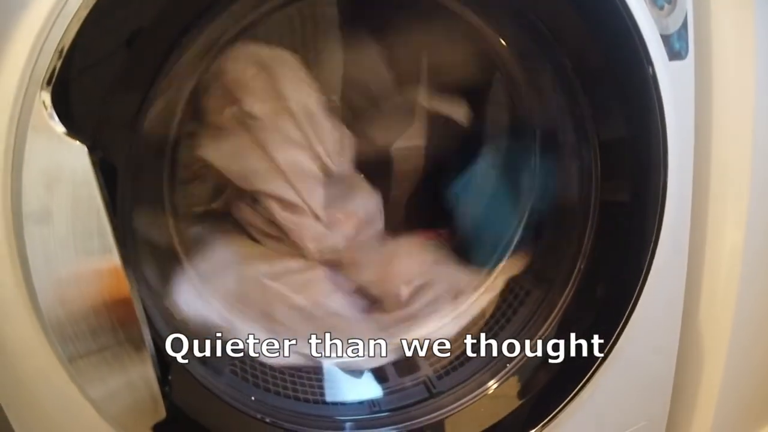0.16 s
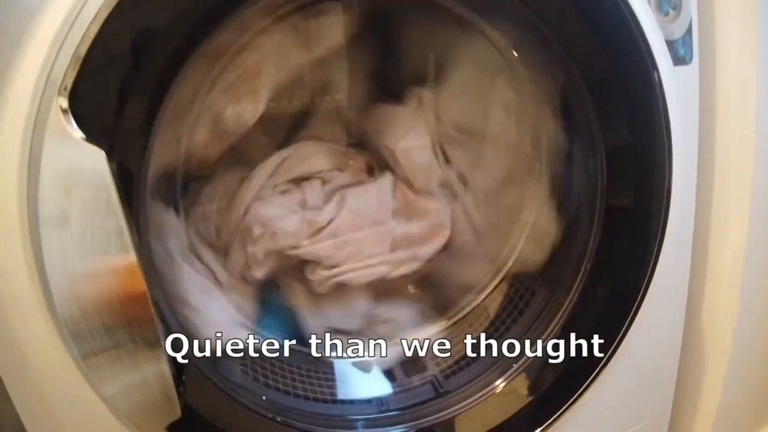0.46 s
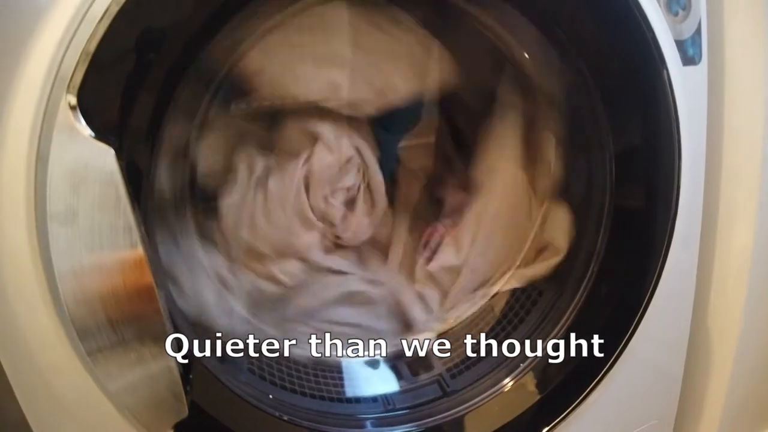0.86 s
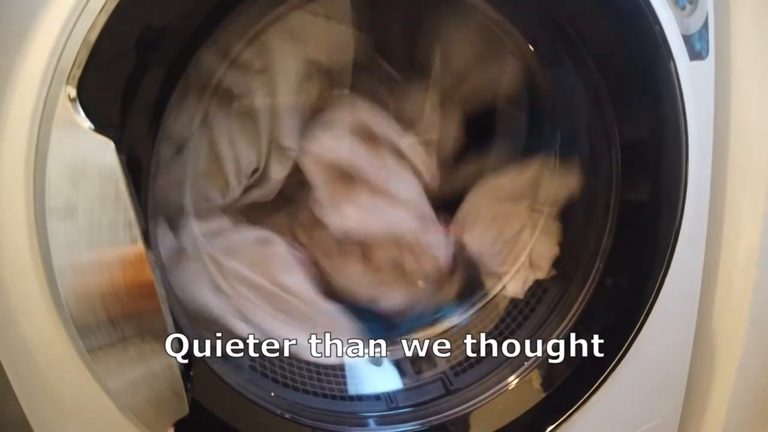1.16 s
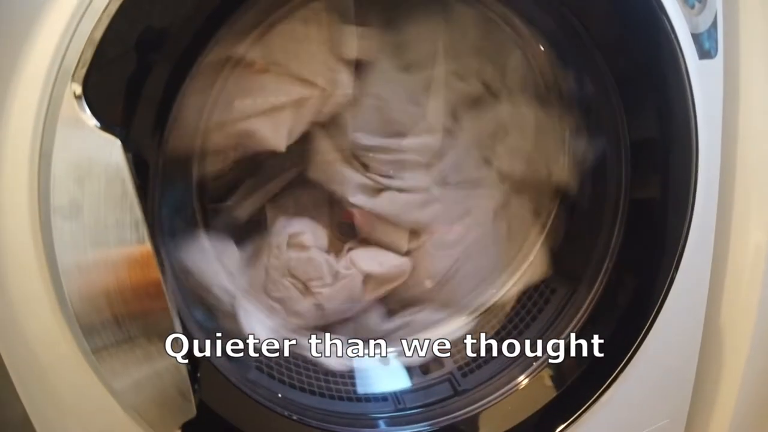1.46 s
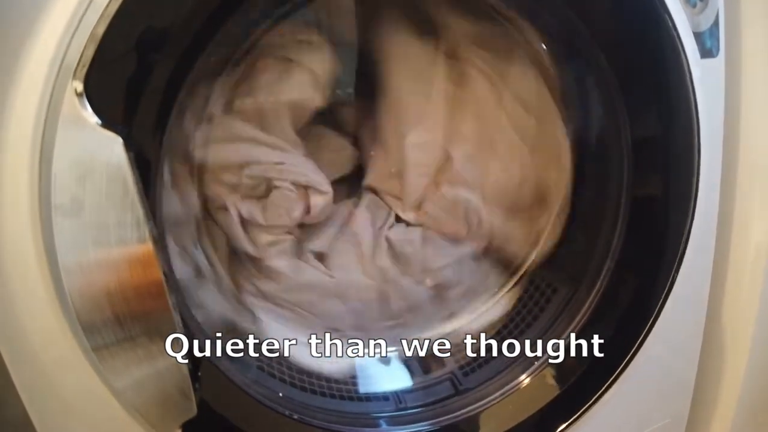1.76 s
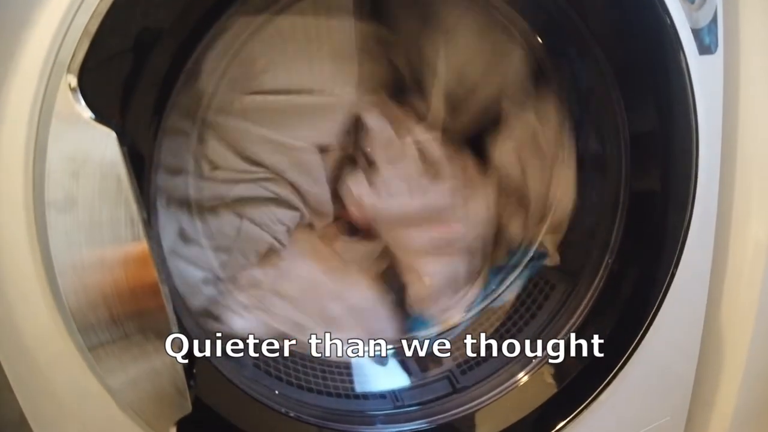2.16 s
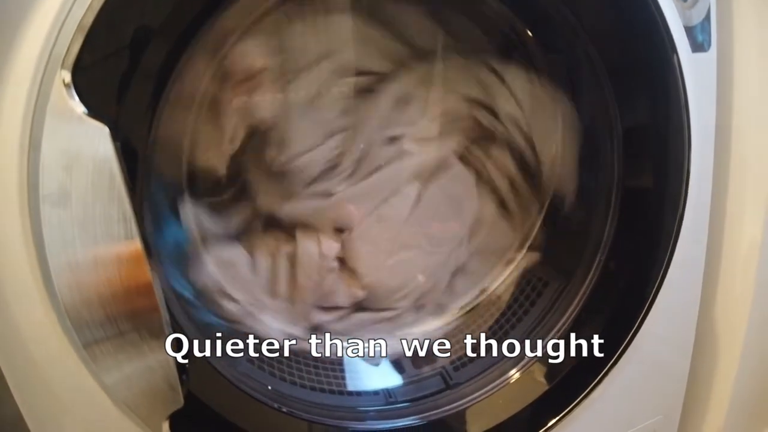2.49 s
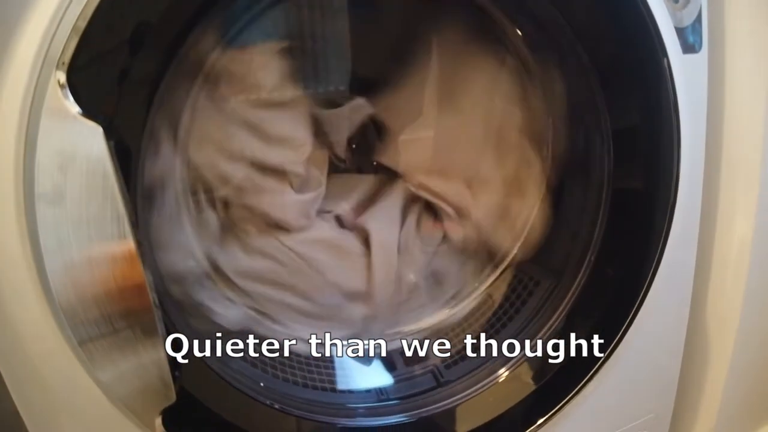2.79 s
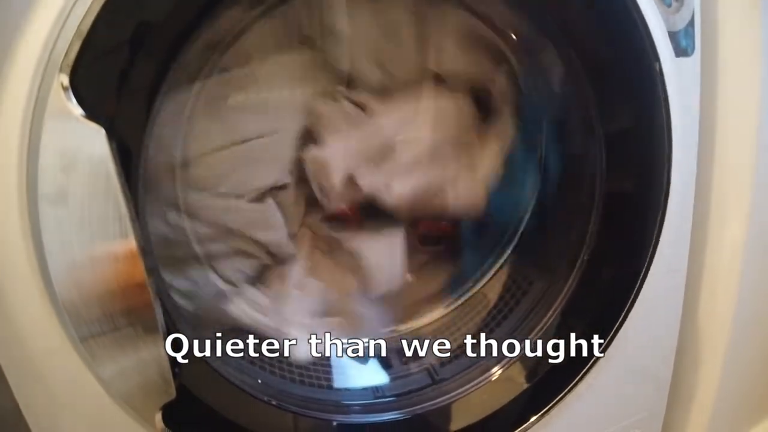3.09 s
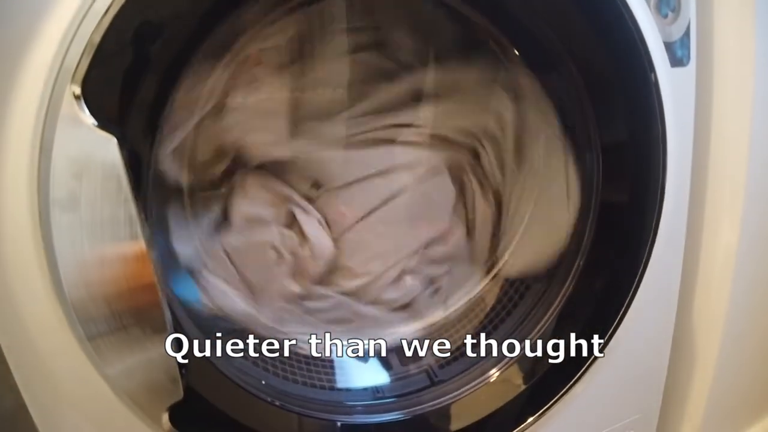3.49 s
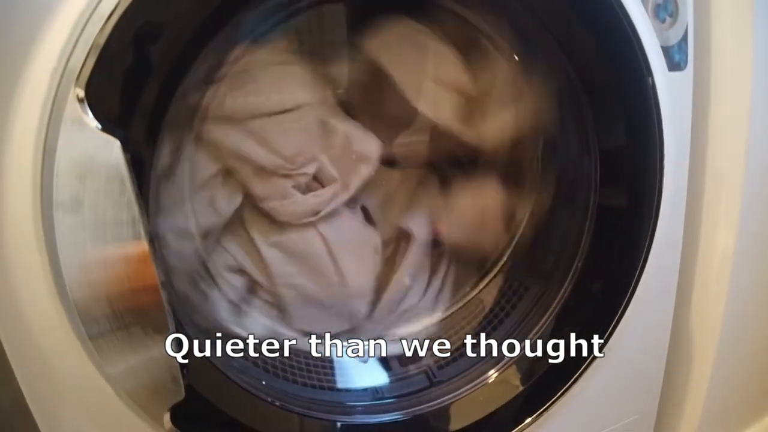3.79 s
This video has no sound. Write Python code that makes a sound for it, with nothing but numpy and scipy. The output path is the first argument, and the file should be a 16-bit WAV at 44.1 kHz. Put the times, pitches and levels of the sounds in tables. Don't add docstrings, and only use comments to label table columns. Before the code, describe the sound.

A tumble dryer runs close by, booming softly and humming as sheets thud and roll inside.

```python
import sys
import numpy as np
from scipy import signal
from scipy.fft import rfft, irfft, next_fast_len
from scipy.io import wavfile
from scipy.ndimage import uniform_filter1d, map_coordinates

SR = 44100
rng = np.random.default_rng(int(sys.argv[2]) if len(sys.argv) > 2 else 0)


def linear_from_db(decibels):
    return 10 ** (np.asarray(decibels, float) / 20)


def wav_record(signal):
    frames = np.transpose(np.atleast_2d(signal))
    bounded = np.clip(frames, -1, 1)
    quanta = np.round(bounded * 32767).astype(np.int16)
    wavfile.write(sys.argv[1], SR, quanta)


N = 173754

# (frequency [Hz], density [dB per Hz])
AIR_SPECTRUM = [(530, -11), (900, -5.5), (986, -8.5), (1080, -5.5), (1740, -2.5), (2620, -15), (3860, -20),
                (5110, -26.5), (6500, -23), (8450, -29), (14300, -120)]
# (time [s], level [dB])
DUCT_FLOW = [(0, -48.5), (.12, -43), (.3, -47.5), (.47, -48.5), (.69, -46.5), (.83, -44.5), (1.25, -46),
             (1.38, -44), (1.5, -45), (1.74, -46.5), (1.85, -44.5), (2.1, -48.5), (2.68, -45),
             (3.12, -47.5), (3.35, -45.5), (3.5, -43.5), (3.74, -45), (3.94, -48)]
# (frequency [Hz], width [Hz], level [dB])
DUCT_MODES = [(1760, 180, -1), (1526, 130, -5), (2058, 29, -2), (2190, 69, -11)]
# (frequency [Hz], density [dB per Hz])
RUMBLE_SPECTRUM = [(20, 4), (50, 5.5), (140, -10.5), (300, -8), (480, -14.5), (900, -16), (1500, -43)]

# (motor order [1], level [dB]))
CARRIERS = [
    (10305, [(-4, -86), (-2, -83), (-1, -82), (0, -71), (1, -80)]),
    (7605, [(-2, -70), (0, -68), (2, -72)]),
]
# (time [s], upper level [dB], lower level [dB])
WHISTLE_LEVELS = [(0, -71, -69), (.6, -78, -66), (1, -73, -55), (1.25, -62, -50), (1.55, -71, -71),
                  (2, -68, -58), (2.4, -72, -62), (2.7, -66, -53), (3.05, -70, -56), (3.3, -75, -62),
                  (3.94, -64, -56)]
# (time [s], rise [dB])
WHISTLE_FLARES = [
    (1.12, 3),
    (1.22, 4.5),
    (1.33, 4),
    (1.43, 5),
    (1.93, 3),
    (2.53, 5),
    (3.65, 7),
]
# (frequency [Hz], width [Hz], level [dB])
IRON_MODES = [(7245, 40, -7), (7310, 60, -10), (7440, 60, -8), (7555, 60, 0), (7620, 60, -4),
              (7700, 80, -3), (7880, 140, -5), (7995, 70, -4), (8140, 70, -10), (8250, 120, -12),
              (8370, 80, -9), (8530, 100, -12), (8622, 45, -9), (8760, 110, -18)]
# (frequency [Hz], width [Hz], level [dB])
RING_MODES = [(10130, 60, -7), (10235, 50, 0), (10340, 200, -4), (10490, 60, -6), (10650, 250, -11)]
# (frequency [Hz], density [dB per Hz])
HISS_SPECTRUM = [(5000, -22), (6500, -1.5), (7100, 9.5), (9100, 3.5), (9450, -3), (10000, -2), (10600, -4),
                 (11500, -3.5), (13000, -24), (15300, -9)]

# (frequency [Hz], level [dB])
MAINS = [(100.3, -34.5), (200.5, -41)]
# (time [s], level [dB])
MOTOR_EFFORT = [(0, -6), (.06, -2), (.2, 2), (.36, -2.5), (.45, -1.5), (.7, 3.5), (.86, -6.5), (.95, -1),
                (1.6, 1), (1.86, -3.5), (1.97, 0.5), (2.17, -4), (2.26, 1), (2.4, -12.5), (2.56, 2),
                (3.05, 1), (3.6, 1.5), (3.94, -6.5)]
# (order [1], level [dB])
MOTOR_ORDERS = [(2, -55.5), (3, -53.5), (4, -54.5), (6, -55.5)]
# (order [1], level [dB])
FAN_ORDERS = [(2, -56.5), (3, -55), (4, -57.5)]
# (time [s], level [dB])
UNMUFFLED = [(0, -5.5), (.14, 5), (.42, -4.5), (.55, 0.5), (.98, -5), (1.33, 2.5), (1.57, -0.5), (1.86, 1),
             (2.22, 3), (2.5, 1.5), (2.69, -3.5), (3, 2.5), (3.41, 3), (3.6, -2.5), (3.85, -19),
             (3.94, -10)]

# (frequency [Hz], width [Hz], level [dB])
PANEL_MODES = [(182, 71, -1), (223.8, 16.3, 0), (248.5, 33, -8), (271.4, 10, -5)]
# (time [s], level [dB])
PANEL_DRIVE = [(0, -32.5), (.4, -39.5), (.7, -34.5), (1.1, -41), (1.35, -32), (1.7, -33), (1.95, -31),
               (2.2, -34), (2.45, -38), (2.85, -32.5), (3.3, -37), (3.55, -43), (3.94, -39)]
# (frequency [Hz], width [Hz], level [dB])
TRIM_MODES = [(317.3, 43, -2.5), (358, 10.5, -6.5), (392.5, 20.5, -2), (422, 19.6, -4), (535, 27, -2),
              (578.7, 101, -4), (681, 26, -3), (743.5, 42, -6.5), (808, 116, -11), (960, 34, -14),
              (1091, 21, -12.5), (1141, 20, -9)]
# (time [s], rise [dB])
CLOTH_SWEEPS = [
    (.1, 3),
    (.69, 2.5),
    (1.22, 1.5),
    (1.33, 5),
    (1.84, 6),
    (2.72, 4.5),
    (2.82, 3.5),
    (3.35, 1),
    (3.62, 4.5),
]
# (frequency [Hz], width [Hz], level [dB])
DRUM_MODES = [(30, 26, -7), (59.1, 18, -5), (77.6, 30, -4), (113, 20.2, -4.5)]
# (time [s], level [dB])
ROLLING_LOAD = [(0, -30), (.3, -33.5), (.75, -28.5), (.9, -35), (1.2, -33), (1.5, -37), (1.9, -39.5),
                (2.25, -36), (2.6, -31), (3.1, -33.5), (3.5, -31), (3.94, -32)]
# (crest time [s], level [dB], drum pitch [Hz])
LANDINGS = [(.15, -25, 77.7), (.28, -24.5, 75.6), (.47, -23.5, 78.4), (.65, -20, 73), (.75, -24, 67.3),
            (.8, -26, 78), (1.03, -25, 72), (.93, -27, 72), (1.12, -23, 70.4), (1.43, -26, 73),
            (1.635, -22, 71.7), (1.784, -18, 76.3), (1.97, -25, 72.4), (2.29, -27.5, 69), (2.51, -23.5, 70),
            (2.8, -29, 70), (2.93, -23, 68), (3.17, -27, 74), (3.6, -24.5, 73), (3.82, -28, 78.2)]

# (frequency [Hz], correlation [1])
PORT_LIKENESS = [(30, 1), (80, .9995), (180, 1), (350, 0.99), (700, 0.97), (1000, 0.85), (1800, 0.92),
                 (2150, .5), (2500, -0.52), (3000, -0.35), (3400, -0.38), (3850, 1), (4400, -0.27),
                 (5800, -0.28), (6600, 0.097), (7300, -0.069), (7900, -0.24), (8600, 0.053), (9500, 0.35),
                 (10400, 0.49), (11300, -0.26), (13500, 0.15), (14500, 0.38), (15300, .9)]
# (frequency [Hz], share [1])
PORT_LEAD = [(2000, -0.19), (2600, -.1), (3500, -.1), (5000, 0), (6600, 0.22), (8600, .2), (9200, 0),
             (10800, -.2), (13000, 0)]
# (frequency [Hz], share [1])
LEAD_WANDER = [(2000, 0.24), (3000, .15), (6500, .2), (7300, .8), (8400, .7), (9200, .3), (10300, .7),
               (11500, .4), (13500, .6), (15000, .2)]
# (frequency [Hz], share [1])
LOST_CELLS = [(2200, 0), (2800, .07), (3800, .04), (5200, .26), (6800, .03), (8700, .05), (9500, .33),
              (10250, .02), (11200, .42), (12500, .7), (14500, .58), (15300, .1)]
# (frequency [Hz], share [1])
LOST_SIDE_CELLS = [(9000, 0), (11000, .05), (12500, .03), (14500, .15), (15300, .75)]

MOTOR_HZ, FAN_HZ, DRUM_HZ = 182.5, 267.6, 75.6
RISE_S, FALL_S = 0.044, 0.022
SWEEP_S, FLARE_S = 0.026, 0.033


def unit(x):
    return x / np.sqrt(np.mean(x ** 2) + 1e-20)


def along(points, hz):
    f, v = np.transpose(points)
    return np.interp(np.log(hz + 1), np.log(f + 1), v)


def curve(rows, axis=1):
    rows = np.transpose(rows)
    v = np.interp(np.arange(N) / SR, rows[0], rows[axis])
    return v - v.mean()


def swells(rows, width_s):
    t = np.arange(N) / SR
    return sum(db * np.exp(-((t - s) / width_s) ** 2) for s, db in rows)


def wobble(rate):
    knots = rng.standard_normal(int(N * rate / SR) + 4)
    return map_coordinates(knots, [np.arange(N) * rate / SR])


def filtered(x, response):
    m = next_fast_len(N + SR // 2)
    return irfft(rfft(x, m) * response(np.fft.rfftfreq(m, 1 / SR)), m)[..., :N]


def body(modes, steep=1):
    def response(f):
        power = 0
        for c, w, db in modes:
            mode = f * w / (c * c - f * f + 1j * f * w)
            power = power + np.abs(linear_from_db(db) * mode ** steep) ** 2
        return np.sqrt(power)
    return response


def spectrum(points):
    return lambda f: linear_from_db(along(points, f))


def rush(response, patchy_db, wide=6, long=14):
    z = signal.stft(rng.standard_normal((2, N + 512)), nperseg=512)[2]
    field = uniform_filter1d(rng.standard_normal(z.shape[1:]), wide, 0)
    field = unit(uniform_filter1d(field, long, 1))
    noise = signal.istft(z * linear_from_db(patchy_db * field), nperseg=512)[1][:, :N]
    return unit(filtered(noise, response))


def tones(lines, drift, swing_db, rate):
    t = np.arange(N) / SR
    total = 0
    for hz, db in lines:
        phase = 2 * np.pi * hz * t + drift * wobble(9) + 2 * np.pi * rng.random((2, 1))
        total = total + linear_from_db(db) * unit(linear_from_db(swing_db * wobble(rate)) * np.sin(phase))
    return total


def port_draught():
    return linear_from_db(-60) * rush(body([(40, 60, 0), (180, 200, -12)]), patchy_db=1.5)


def rumble():
    return linear_from_db(-38) * rush(spectrum(RUMBLE_SPECTRUM), patchy_db=0.95)


def air():
    flow_level = linear_from_db(-44 + 0.24 * curve(DUCT_FLOW) + 0.2 * wobble(8.74))
    flow = flow_level * rush(spectrum(AIR_SPECTRUM), patchy_db=1.5, wide=3, long=20)
    duct_level = linear_from_db(-51.5 + 2.0 * curve(DUCT_FLOW))
    return flow + duct_level * rush(body(DUCT_MODES, steep=2), patchy_db=0.0)


def whistles():
    voices = []
    for i, (hz, sidebands) in enumerate(CARRIERS):
        lines = [(hz + k * MOTOR_HZ, db) for k, db in sidebands]
        level = linear_from_db(curve(WHISTLE_LEVELS, axis=i + 1))
        voices.append(level * tones(lines, drift=2.5, swing_db=3, rate=3))
    upper, lower = voices
    return linear_from_db(swells(WHISTLE_FLARES, FLARE_S)) * upper + lower


def motor_iron():
    turn = 2 * np.pi * MOTOR_HZ * np.arange(N) / SR
    pulse = 1 + .05 * np.sin(turn) + .07 * np.sin(2 * turn)
    iron_level = linear_from_db(-46.5 + 0.13 * curve(WHISTLE_LEVELS, axis=2) + 0.61 * wobble(7.05))
    iron = iron_level * rush(body(IRON_MODES, steep=1.9), patchy_db=2.5, wide=2, long=25)
    flares = swells(WHISTLE_FLARES, FLARE_S)
    ring_level = linear_from_db(-64 + .3 * flares + .3 * curve(WHISTLE_LEVELS) + 1.5 * wobble(8))
    ring = ring_level * rush(body(RING_MODES, steep=1.5), patchy_db=2.5, wide=2, long=30)
    return pulse * (iron + ring)


def inverter():
    hiss = rush(lambda f: spectrum(HISS_SPECTRUM)(f) * (f > 4000), patchy_db=2.5)
    return whistles() + motor_iron() + linear_from_db(-55.5) * hiss


def mains_hum():
    low = tones(MAINS[:1], drift=0.067, swing_db=0.3, rate=2.84)
    high = tones(MAINS[1:], drift=0.32, swing_db=2, rate=6.97)
    return linear_from_db(curve(MOTOR_EFFORT)) * (low + high)


def motor_and_fan():
    shaft_lines = [(k * MOTOR_HZ, db) for k, db in MOTOR_ORDERS]
    fan_lines = [(k * FAN_HZ, db) for k, db in FAN_ORDERS]
    shaft = tones(shaft_lines, drift=1.0, swing_db=0.3, rate=6.22)
    fan = tones(fan_lines, drift=0.51, swing_db=0.8, rate=4.92)
    return linear_from_db(curve(UNMUFFLED)) * (shaft + fan)


def panels_and_trim():
    panel_level = linear_from_db(-35 + 0.72 * curve(PANEL_DRIVE))
    panels = panel_level * rush(body(PANEL_MODES, steep=2.04), patchy_db=-2.0, wide=2, long=30)
    trim_level = linear_from_db(-42 + swells(CLOTH_SWEEPS, SWEEP_S) + 0.75 * wobble(2.36))
    trim = trim_level * rush(body(TRIM_MODES, steep=2.12), patchy_db=1.5, wide=2, long=30)
    return panels + trim


def drum():
    t = np.arange(N) / SR
    note = 2 * np.pi * (DRUM_HZ * t + rng.random((2, 1))) + 0.84 * wobble(6)
    rolling = 0.85 * rush(body(DRUM_MODES, steep=1.75), patchy_db=1.0)
    own_note = linear_from_db(-4.5 + 1.4 * wobble(5)) * np.sin(note)
    boom = linear_from_db(np.interp(t, *np.transpose(ROLLING_LOAD))) * (rolling + own_note)
    for s, db, hz in LANDINGS:
        swell = np.exp(-((t - s) / np.where(t < s, RISE_S, FALL_S)) ** 2)
        bent_note = note + 2 * np.pi * (hz - DRUM_HZ) * (t - s)
        boom = boom + linear_from_db(db) * swell * np.sin(bent_note)
    return boom


def scene():
    background = rumble() + air() + inverter()
    machine = background + mains_hum() + motor_and_fan() + panels_and_trim() + drum()
    hz, _, (a, b) = signal.stft(machine, SR, nperseg=2048)
    angle = np.arccos(np.clip(along(PORT_LIKENESS, hz), -1, .9995))[:, None] / 2
    roam = uniform_filter1d(rng.standard_normal(a.shape), size=5, axis=0)
    roam = unit(uniform_filter1d(roam, size=20, axis=1))
    lead = along(PORT_LEAD, hz)[:, None] + along(LEAD_WANDER, hz)[:, None] * roam
    lead = np.clip(lead, -1, 1)
    mid = a * np.cos(angle)
    side = 1j * np.sin(angle) * (a * lead + b * np.sqrt(1 - lead ** 2))
    ports = signal.istft(np.array([mid + side, mid - side]), SR, nperseg=2048)[1][:, :N]
    return ports + port_draught()


def starved(x):
    lead_in = 104
    pair = np.pad([x[0] + x[1], x[0] - x[1]], [(0, 0), (lead_in, 0)]) / 2
    hz, _, z = signal.stft(pair, SR, window="cosine", nperseg=2048)
    frames = z.shape[2]
    blocks = np.kron(rng.standard_normal((2, 86, frames // 2 + 1)), np.ones((12, 2)))
    blocks = blocks[:, :len(hz), :frames]
    budget = unit(uniform_filter1d(rng.standard_normal((2, 1, frames)), size=5, axis=2))
    strength = 1.5 * blocks + .5 * budget + 1.4 * np.log(np.abs(z) + 1e-12)
    rank = strength.argsort(2).argsort(2) / frames
    share = along(LOST_CELLS, hz) + np.outer([0, 1], along(LOST_SIDE_CELLS, hz))
    kept = np.where(rank < share[..., None], linear_from_db(-35), 1)
    thinned = signal.istft(z * kept, SR, window="cosine", nperseg=2048)[1]
    mid, side = thinned[:, lead_in:][:, :N]
    return np.array([mid + side, mid - side])


def band_limit(x):
    return signal.sosfilt(signal.butter(12, 17110, fs=SR, output="sos"), x)


def record(dry):
    limited = filtered(dry, lambda hz: hz < 15760)
    mix = starved(limited)
    return band_limit(mix)


dry = scene()
out = record(dry)
wav_record(out)
```